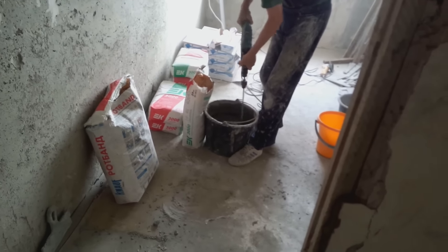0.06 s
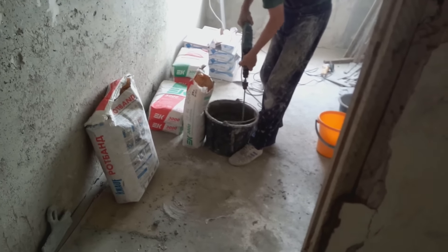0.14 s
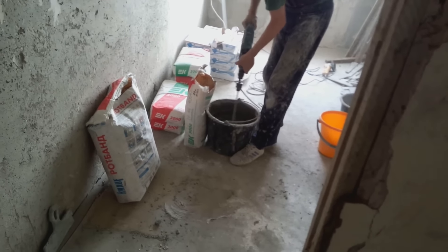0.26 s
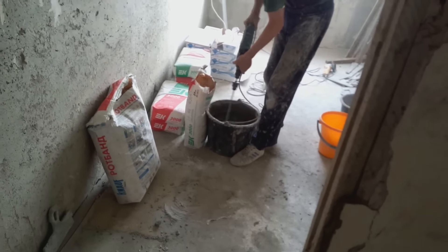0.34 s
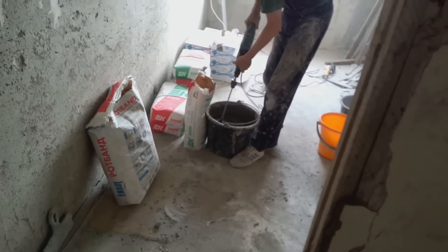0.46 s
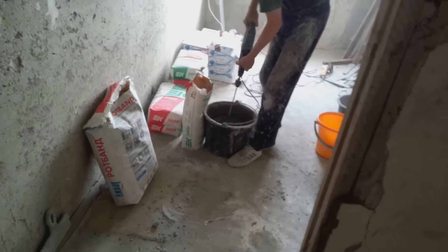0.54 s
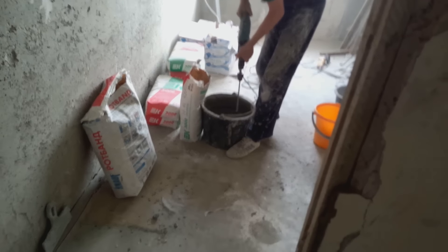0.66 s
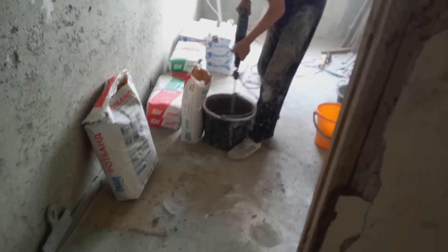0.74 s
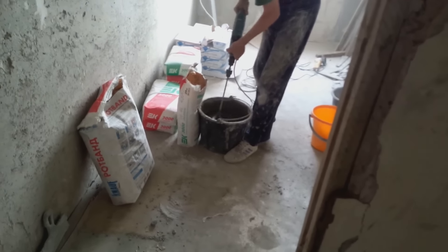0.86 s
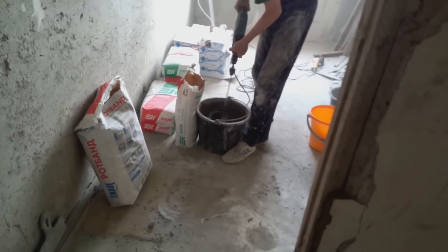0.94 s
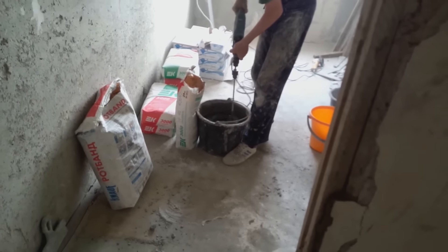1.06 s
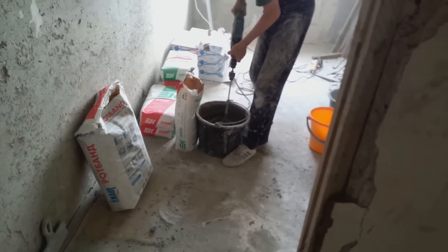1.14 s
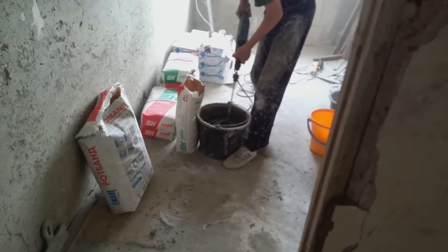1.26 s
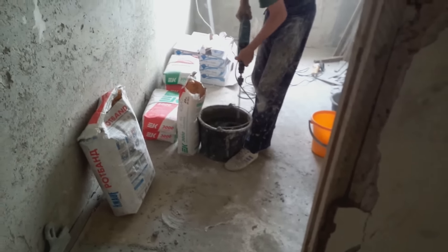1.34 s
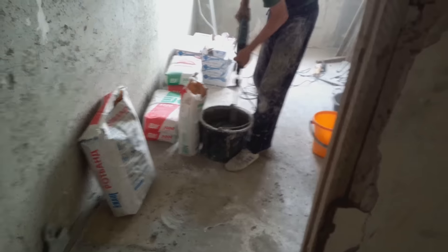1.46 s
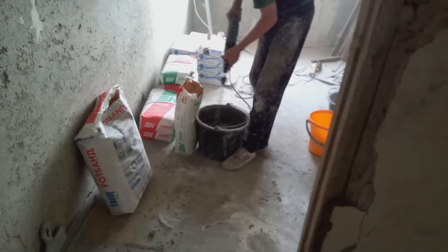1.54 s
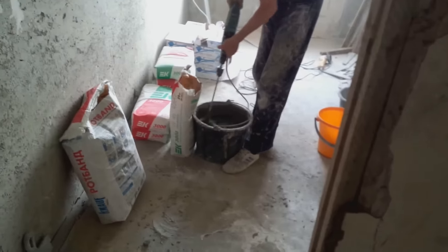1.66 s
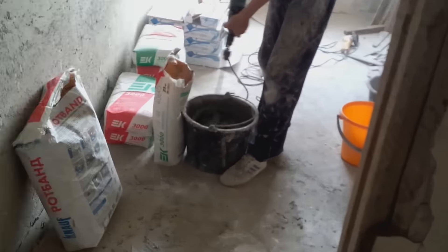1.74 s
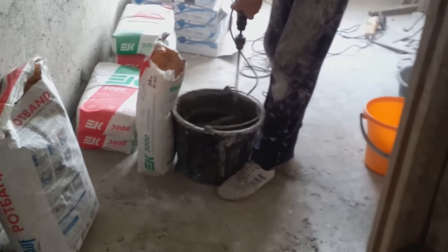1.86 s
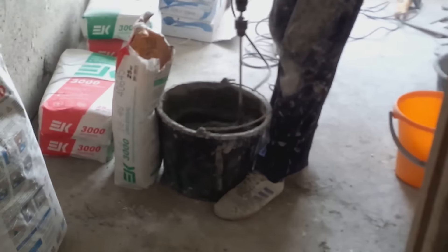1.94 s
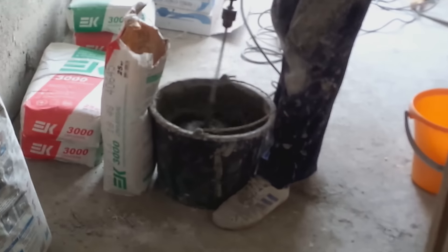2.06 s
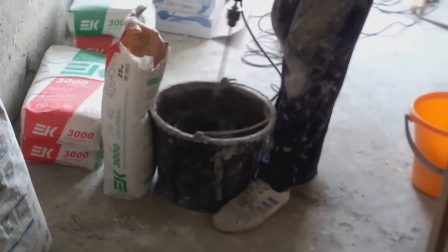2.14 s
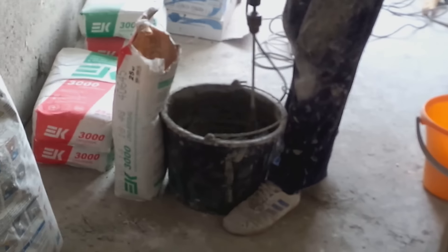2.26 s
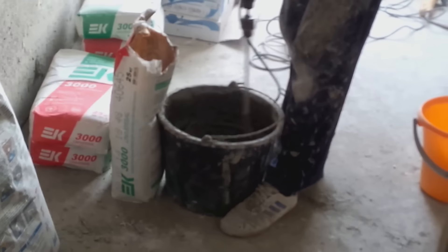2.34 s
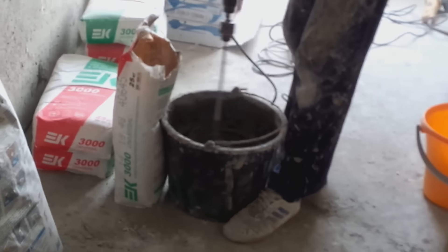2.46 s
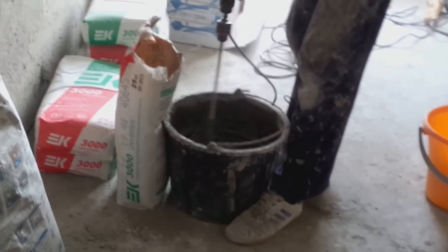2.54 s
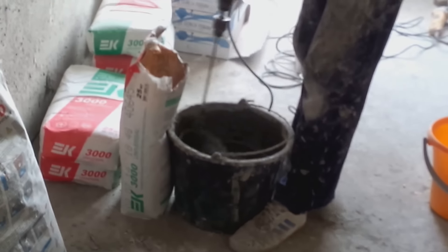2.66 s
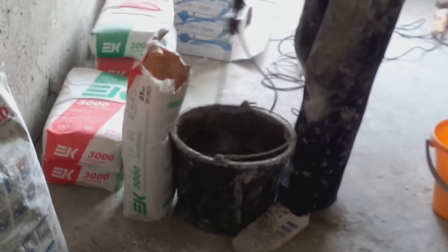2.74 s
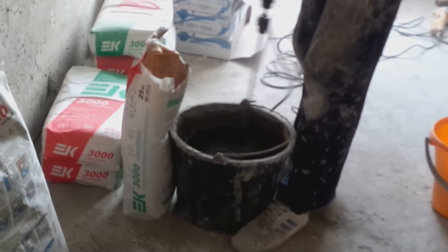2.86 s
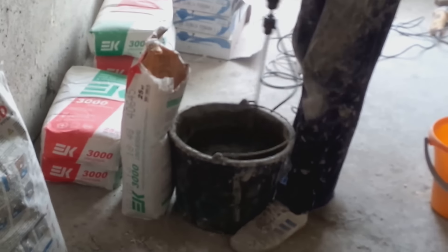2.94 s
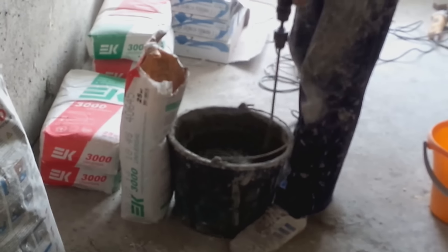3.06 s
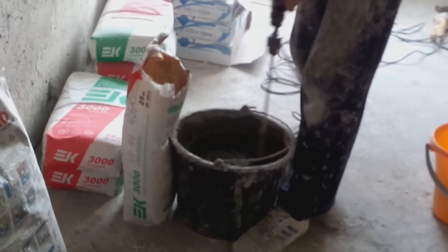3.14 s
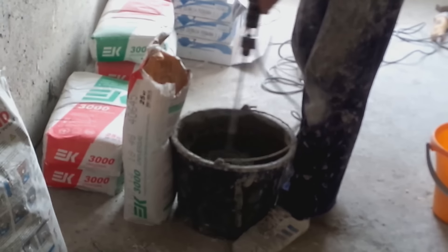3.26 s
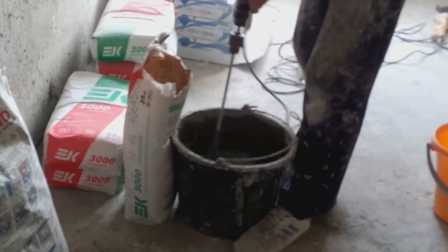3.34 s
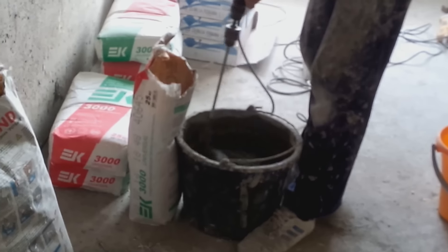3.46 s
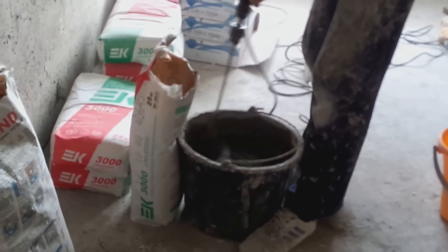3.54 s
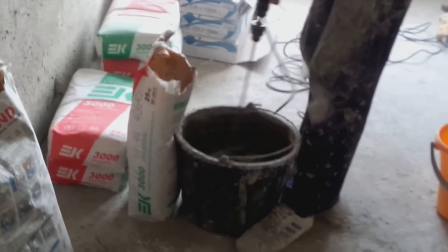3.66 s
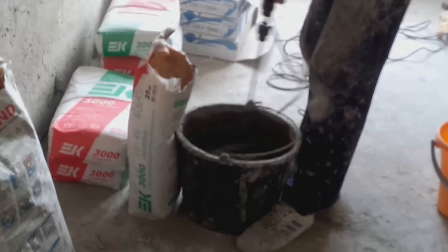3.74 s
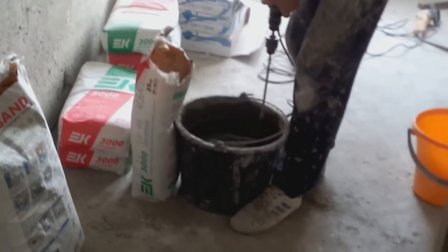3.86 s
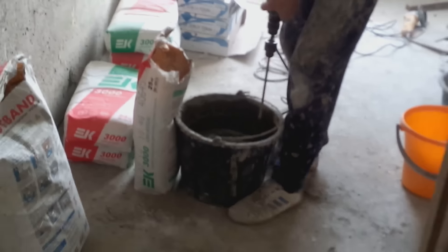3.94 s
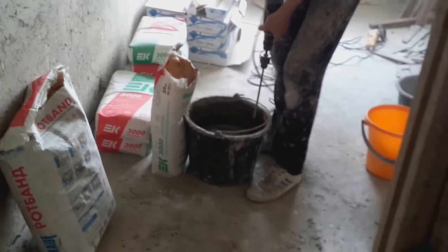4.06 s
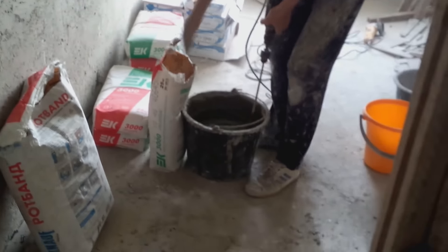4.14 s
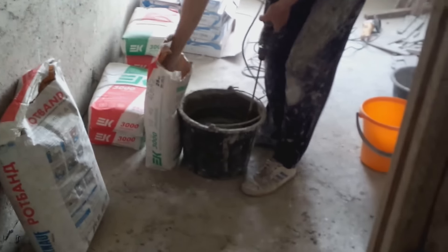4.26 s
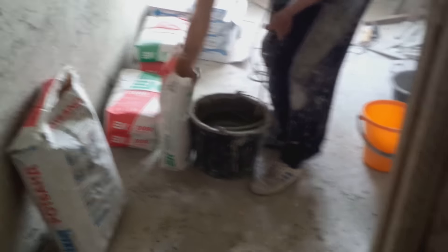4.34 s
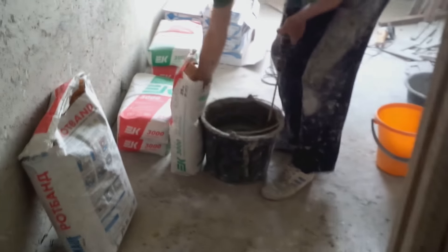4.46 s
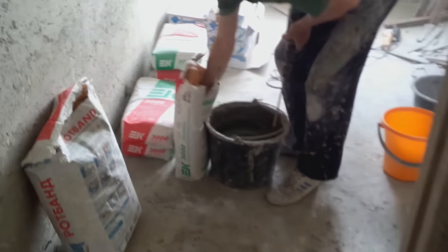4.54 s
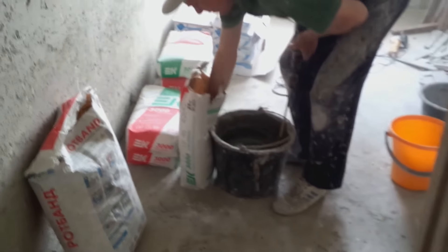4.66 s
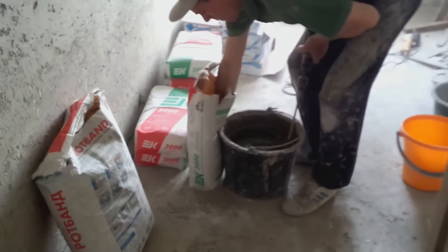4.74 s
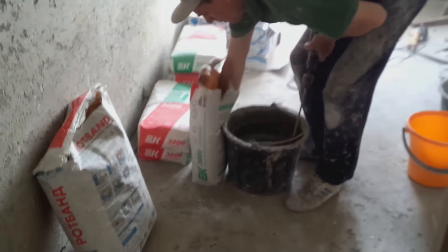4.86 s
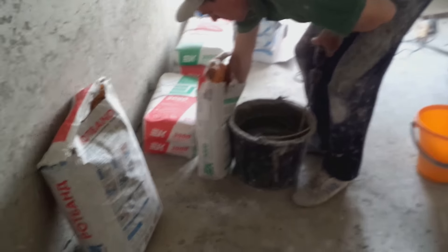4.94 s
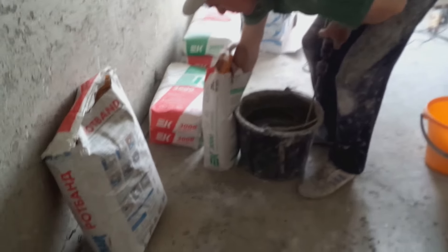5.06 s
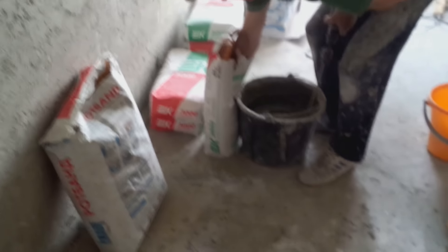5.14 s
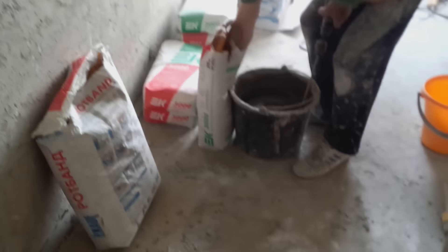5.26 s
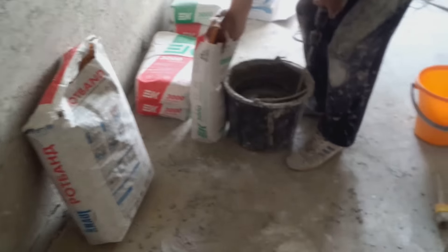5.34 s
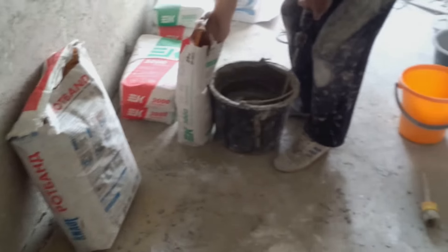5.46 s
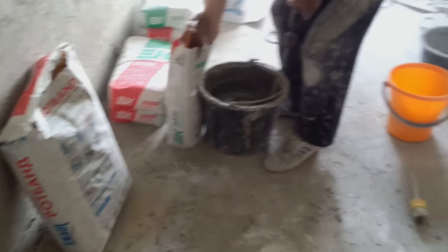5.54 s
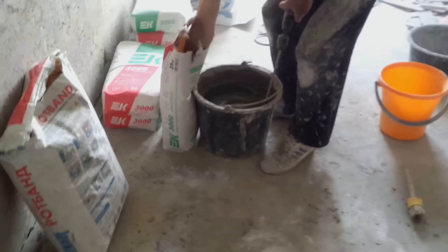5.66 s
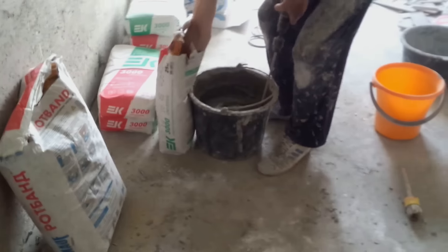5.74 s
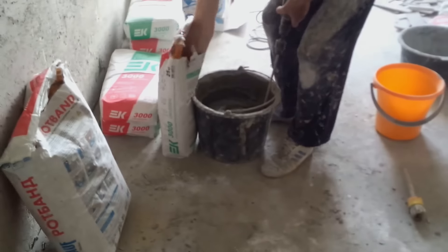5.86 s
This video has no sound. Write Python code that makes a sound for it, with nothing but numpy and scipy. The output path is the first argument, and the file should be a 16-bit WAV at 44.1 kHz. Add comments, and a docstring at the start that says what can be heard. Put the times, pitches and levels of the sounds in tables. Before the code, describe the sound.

In a bare room a loud geared drill whine stirs heavy mix, glides down in pitch to rest, and a paper sack crinkles.

```python
"""An electric drill turns a paddle in a bucket of thick plaster in a bare room: gear teeth whine as sine tones,
the fan sings and blows coloured noise, the mix churns in lumps and the paddle knocks the bucket wall.
The trigger is let go and the motor coasts to rest, its tones gliding down through the ringing gear case.
Near the end a paper sack ticks, as short damped rings, and rustles, as flickering noise.
A mono recorder with a low sampling rate mirrors the treble above its band edge."""
import sys
import numpy as np
from scipy import signal
from scipy.fft import rfft, irfft, next_fast_len
from scipy.io import wavfile
from scipy.ndimage import uniform_filter1d, map_coordinates

SR = 44100
rng = np.random.default_rng(int(sys.argv[2]) if len(sys.argv) > 2 else 0)


def unload_audio(sound):
    """Save the sound as a 16-bit wav file, at the path given as the first command line argument."""
    columns = np.transpose(np.atleast_2d(sound))
    # keep every value between -1 and 1, then stretch to whole-number steps
    steps = np.round(np.clip(columns, -1, 1) * 32767)
    wavfile.write(sys.argv[1], SR, steps.astype(np.int16))


def decibels_to_gain(level_db):
    """Convert a level in decibels to a linear amplitude gain (20 dB per decade)."""
    exponent = np.asarray(level_db, float) / 20
    return 10 ** exponent


N = 260631  # length in samples

BLADES_PER_TOOTH = 13 / 5  # fan blades that pass for each tooth contact
# The main tones of the drill, as multiples of the gear mesh rate (tooth contacts a second).
# The first three come from the teeth, the last from the fan blades.
TONE_MULTIPLES = [2, 3, 4, BLADES_PER_TOOTH]
# How the gear case radiates a gliding tone. Each row: frequency in Hz, gain in dB.
CASE_GAIN = [(600, -12), (800, 8), (950, -16), (1060, -2), (1150, -12), (1240, 2), (1350, -13), (1520, -5),
             (1610, 7.5), (1700, 4), (1830, 1.5), (2000, -9), (2180, 3.5), (2420, 2.5), (2520, -11),
             (2700, -15), (2860, 2), (3050, -15), (5000, -7)]


def unit(x):
    """Scales x to an rms of 1."""
    return x / np.sqrt(np.mean(x ** 2) + 1e-20)


def along(points, hz):
    """Reads a curve of (Hz, value) points at hz, on a log frequency axis."""
    f, v = np.transpose(points)
    return np.interp(np.log(hz + 1), np.log(f + 1), v)


def curves(rows):
    """Gives one value per sample for each column after the time."""
    s, *columns = np.transpose(rows)
    return [np.interp(np.arange(N) / SR, s, column) for column in columns]


def wobble(rate):
    """A smooth random curve through rate random points a second."""
    points = rng.standard_normal(int(N * rate / SR) + 4)
    return map_coordinates(points, [np.arange(N) * rate / SR])


def coloured(x, points):
    """Filters x with a gain curve of (Hz, dB) points."""
    m = next_fast_len(N + SR // 4)
    gain = decibels_to_gain(along(points, np.fft.rfftfreq(m, 1 / SR)))
    return irfft(rfft(x, m) * gain, m)[:N]


def resonant(x, modes):
    """Lifts narrow peaks in x, as a ringing body does; modes are (Hz, width in Hz, dB)."""
    m = next_fast_len(N + SR // 4)
    f = np.fft.rfftfreq(m, 1 / SR)
    lift = 1
    for hz, width, db in modes:
        lift = lift + decibels_to_gain(db) * 1j * f * width / (hz * hz - f * f + 1j * f * width)
    return irfft(rfft(x, m) * lift, m)[:N]


def patchy(patch_db):
    """White noise whose strength varies in patches of time and frequency."""
    z = signal.stft(rng.standard_normal(N), nperseg=512)[2]
    field = uniform_filter1d(rng.standard_normal(z.shape), size=6, axis=0)
    field = uniform_filter1d(field, size=8, axis=1)
    return signal.istft(z * decibels_to_gain(patch_db * unit(field)), nperseg=512)[1][:N]


def room(x):
    """The bare walls' answer: a noise tail in which each frequency dies at its own speed."""
    # Each row: frequency in Hz, time to fall by 60 dB in seconds.
    decay_times = [(200, 0.17), (2000, 0.23), (7000, 0.12)]
    hz, t, z = signal.stft(rng.standard_normal(SR // 2), SR, nperseg=256)
    fading = decibels_to_gain(-60 * t / along(decay_times, hz)[:, None])
    tail = signal.istft(z * fading, SR, nperseg=256)[1]
    return signal.fftconvolve(x, tail / np.linalg.norm(tail))[:N]


def knocks(events):
    """Short damped rings with a puff of noise, and their echo."""
    out, t = np.zeros(N + SR), np.arange(SR // 4) / SR
    for s, db, hz, t60, crack in events:
        ring = np.sin(2 * np.pi * hz * t) + crack * rng.standard_normal(len(t))
        soft_onset = 1 - np.exp(-40 * t / t60)
        out[round(s * SR):][:len(t)] += decibels_to_gain(db - 60 * t / t60) * soft_onset * ring
    return out[:N] + decibels_to_gain(-9) * room(out[:N])


def sack():
    """A hand reaches into the paper: ticks ring briefly, then flickering noise makes a crinkling rustle."""
    # Each row: start in seconds, level in dB, frequency in Hz, time to fall by 60 dB in seconds,
    # share of noise against the ring.
    ticks = [(5.561, -33, 1120, .014, .15), (5.809, -31, 1070, .014, .1), (5.816, -41, 4500, .008, 2.5)]
    # Each row: time in seconds, rustle level in dB.
    rustle_level = [(5.78, -90), (5.82, -57), (5.85, -57), (5.865, -49), (5.89, -51), (5.91, -50)]
    # Colour of the rustle. Each row: frequency in Hz, gain in dB.
    paper_colour = [(900, -40), (1500, -14), (2100, -12), (2350, 0), (2550, -7), (2750, -2), (3000, -12),
                    (7000, -17), (9000, -45)]
    flickering = rng.standard_normal(N) * decibels_to_gain(2.5 * wobble(150))
    crinkle = unit(coloured(flickering, paper_colour))
    return knocks(ticks) + decibels_to_gain(curves(rustle_level)[0]) * crinkle


def bucket():
    """The paddle churns the mix in lumps and knocks the wall; the floor carries a rumble."""
    # Each row: time in seconds, level of the churning mix in dB, level of the rumble in dB.
    levels = [(0, -30.5, -48), (.1, -31.5, -43), (.36, -31.5, -42), (.41, -27.5, -52), (.5, -26.5, -36),
              (.6, -30.5, -34), (.72, -35.5, -43), (.9, -33.5, -39.5), (1.18, -39.5, -40),
              (1.62, -52.5, -63), (1.7, -35, -51), (1.83, -44, -60), (1.89, -37, -53), (2.45, -49, -62),
              (2.7, -39, -50), (2.85, -38.5, -52), (3.01, -33, -49), (3.06, -38.5, -51), (3.44, -39, -52),
              (3.55, -34, -55), (3.9, -39, -42.5), (4.2, -38.5, -55), (4.56, -41.5, -55),
              (4.66, -32.5, -54), (4.72, -30, -54), (4.84, -41, -56), (5.3, -48, -67), (5.4, -38.5, -57),
              (5.46, -47.5, -66), (5.91, -57, -60)]
    # Colours of the mix and of the rumble. Each row: frequency in Hz, gain in dB.
    mix_colour = [(47, -39), (80, -12.5), (118, -7.5), (216, -1), (392, -3.5), (450, -2), (550, -22),
                  (720, -28), (1210, -120)]
    rumble_colour = [(18, -37), (30, 9), (48, 10.5), (65, -16), (91, 9.5), (110, 2), (140, -37),
                     (240, -120)]
    # Paddle against the bucket. Each row: start in seconds, strength in dB (each wall ring adds its own level).
    thuds = [(1.69, -18), (4.6, -27), (4.628, -24), (4.66, -26), (4.69, -18), (4.73, -24), (4.762, -25),
             (4.79, -28)]
    # Rings of the bucket wall. Each row: frequency in Hz, level in dB against the blow,
    # time to fall by 60 dB in seconds.
    wall_rings = [(262, 2, .045), (400, -5, .035), (180, -7, .04), (110, -15, .045)]
    # One blow rings the paddle's shaft. Each row: start in seconds, level in dB, frequency in Hz,
    # time to fall by 60 dB in seconds, share of noise against the ring.
    shaft_ring = [(4.688, -16, 1810, .14, .1)]
    mix_db, rumble_db = curves(levels)
    lumps = decibels_to_gain(1.7 * wobble(14) + 0.65 * wobble(8))
    churn = decibels_to_gain(mix_db) * unit(lumps * coloured(patchy(patch_db=1.0), mix_colour))
    swelling = decibels_to_gain(2.5 * wobble(5))
    rumble = decibels_to_gain(rumble_db) * unit(swelling * coloured(rng.standard_normal(N), rumble_colour))
    blows = [(s, db + ring_db, hz, t60, 0.05) for s, db in thuds for hz, ring_db, t60 in wall_rings]
    return churn + rumble + knocks(blows + shaft_ring)


def housing_growl(growl_db):
    """The housing growls: almost even noise in a fixed colour."""
    # Each row: frequency in Hz, gain in dB.
    growl_colour = [(240, -23.5), (400, -14.5), (449, -9.5), (590, -8.5), (812, 0), (1040, -4), (1230, -8),
                    (1600, -7.5), (2080, -9.5), (3520, -120)]
    return decibels_to_gain(growl_db) * unit(coloured(patchy(patch_db=0.1), growl_colour))


def air_rush(mesh, rush_db, turning):
    """Gear and air noise, partly struck in time with the teeth, that dulls as the speed falls."""
    # Colours at speed and near rest. Each row: frequency in Hz, gain in dB.
    fast_colour = [(710, -35.5), (1200, -9.5), (1550, -6), (1760, 0), (1950, -7.5), (2660, -4.5),
                   (3020, -6), (4300, -5.5), (5860, -11.5), (7000, -11.5), (9100, -36.5), (15400, -120)]
    slow_colour = [(350, -44.5), (600, -7), (651, -5), (817, -18), (887, -9.5), (1710, -6), (4880, -12),
                   (7000, -17), (9100, -38), (15400, -120)]
    # Rings of the gear case near rest. Each row: frequency in Hz, width in Hz, gain in dB.
    case_rings = [(810, 50, 4), (1200, 60, 4), (1780, 80, -4)]
    fast = np.interp(np.arange(N) / SR, [4.5, 5.4], [1, 0])
    struck = 1 + 0.28 * np.cos(mesh) * turning
    air = patchy(patch_db=1.0) * struck * decibels_to_gain(0.73 * wobble(120) + 0.32 * wobble(30))
    at_speed = unit(coloured(air, fast_colour))
    near_rest = 1.7 * unit(resonant(coloured(air, slow_colour), case_rings))
    return decibels_to_gain(rush_db) * (fast * at_speed + (1 - fast) * near_rest)


def faint_partials(mesh, hz, driven):
    """Weaker tooth multiples, unsteady and blurred by play in the gears; coasting, the case picks them out."""
    # Each row: multiple of the mesh rate, level in dB before the rush, strain and case gains are added.
    partials = [(1, -15.5), (14 / 15, -14.5), (5, -14.5), (6, -13.5), (7, -17.5), (7.8, -18.5), (8, -18.5)]
    out = np.zeros(N)
    for k, db in partials:
        hum_drop_db = 14 if k <= 1 else 0  # the lowest partials need the load
        gliding_db = (1 - driven) * (1.5 + along(CASE_GAIN, k * hz) - hum_drop_db)
        blur = 1.5 * np.sqrt(hz / hz.max()) * wobble(95)
        out += decibels_to_gain(db + 3 * wobble(9) + gliding_db) * np.sin(k * mesh + blur)
    return out


def tone_levels(hz, coasted, driven):
    """Levels of the main tones in dB: unsteady under power, then sinking while the case colours the glide."""
    # Under power, the tone at twice the mesh rate. Each row: time in seconds, level in dB.
    whine_level = [(0.02, -14.5), (.08, -29), (.34, -25.5), (.43, -19.5), (.54, -29.5), (.65, -17.5),
                   (.8, -30.5), (.88, -18), (.95, -25.5), (1.15, -22), (1.3, -24), (1.41, -17.5),
                   (1.6, -27), (1.83, -19), (1.89, -33), (1.99, -25), (2.06, -18), (2.2, -23.5),
                   (2.36, -35), (2.41, -12.5), (2.53, -17), (2.63, -20.5), (2.76, -18.5), (2.8, -20),
                   (2.9, -14.5), (2.94, -23), (3.15, -32), (3.3, -18.5), (3.37, -32.5), (3.66, -27.5),
                   (3.81, -18.5), (3.99, -21), (4.16, -13)]
    # Under power, the others. Each row: time in seconds, levels in dB at three times and four times
    # the mesh rate and of the fan blade tone.
    overtone_levels = [(0, -30.5, -28, -28), (.22, -18.5, -31.5, -31), (.62, -31.5, -27, -27),
                       (.76, -30.5, -31, -29.5), (.9, -21.5, -27, -28), (1.2, -33, -31.5, -32),
                       (1.34, -22.5, -27, -26), (1.72, -34.5, -35, -39), (1.88, -28, -36, -29),
                       (2.02, -25.5, -37, -39), (2.4, -33.5, -33, -35), (2.7, -29, -34, -30.5),
                       (3.1, -30.5, -29, -34), (3.2, -25.5, -28, -39), (3.36, -34, -35, -33),
                       (3.58, -37, -32, -31), (3.68, -29.5, -35, -20.5), (3.85, -32, -31, -40),
                       (3.93, -28.5, -24, -40), (4.17, -27.5, -30.5, -31)]
    # Starting level in dB of each main tone in the coast, before the case gain is added.
    coast_start = [-26.5, -23, -28, -32.5]
    # random fading as the tool swings about
    powered_db = [curves(whine_level)[0] + 0.5 * wobble(12)]
    powered_db += [db + 2 * wobble(18) for db in curves(overtone_levels)]
    sink_db = 24.5 * coasted  # 24.5 dB a second
    coasting_db = [db - sink_db + along(CASE_GAIN, k * hz) for k, db in zip(TONE_MULTIPLES, coast_start)]
    return driven * np.array(powered_db) + (1 - driven) * np.array(coasting_db)


def whine(mesh, levels_db, backlash):
    """Tooth contacts sound as multiples of the mesh rate; the fan blades add a tone of their own."""
    wheel = mesh / 15  # a driven wheel of 15 teeth runs slightly untrue: sidebands once a turn
    out = np.zeros(N)
    for k, db in zip(TONE_MULTIPLES, levels_db):
        untrue = (0.26 + 0.25 * wobble(4.014)) * np.sin(wheel + 1.3 * wobble(3.003))
        drift = k * (0.044 * k * wobble(60) + backlash * wobble(110)) + untrue
        flutter = 1 + 0.26 * wobble(30) + 0.25 * wobble(80)
        out += decibels_to_gain(db) * flutter * np.sqrt(2) * np.sin(k * mesh + drift)
    return out


def drill():
    """The motor's speed sets the whine, which stands over growl and rush and echoes in the room."""
    # The speed sags with the load, then coasts down. Each row: time in seconds,
    # gear mesh rate in Hz before smoothing.
    speed = [(0, 890.4), (.37, 860), (.58, 845.4), (.74, 848.5), (.88, 858), (1.02, 842.3), (1.15, 858),
             (1.48, 870), (1.85, 881.5), (2.4, 883.4), (2.59, 883), (2.96, 900.4), (3.1, 892.5),
             (3.33, 897.5), (3.55, 907.6), (3.7, 910.5), (4.07, 903), (4.18, 903.4), (4.27, 807),
             (4.36, 746.4), (4.66, 490), (4.8, 421), (4.93, 384.2), (5.05, 320.2), (5.25, 249), (5.42, 208),
             (5.7, 130)]
    # Each row: time in seconds, housing growl level in dB, gear and air rush level in dB (before wavering).
    noise_levels = [(0, -26, -19.5), (1.3, -27, -20.5), (1.7, -25.5, -19), (4.2, -25, -19),
                    (4.35, -26, -19.5), (4.59, -28, -23.5), (4.65, -23, -24.5), (5.04, -35, -36),
                    (5.12, -40, -37), (5.44, -43, -47), (5.52, -45, -53), (5.58, -50, -53.5),
                    (5.87, -59, -59.5), (5.91, -56, -51)]
    t = np.arange(N) / SR
    hz = uniform_filter1d(curves(speed)[0], size=1800)  # the rotor's inertia smooths its speed
    mesh = 2 * np.pi * np.cumsum(hz) / SR  # phase of the tooth contacts
    coasted = np.maximum(t - 4.185, 0)  # seconds since the trigger was let go
    driven = np.clip(1 - coasted / 0.025, 0, 1)
    loaded = np.clip(1 - coasted / 0.1, 0, 1)
    turning = np.interp(t, [5.35, 5.6], [1, 0])
    growl_db, rush_db = curves(noise_levels)
    growl_db = growl_db + wobble(12)
    rush_db = rush_db + 0.5 * wobble(10)
    backlash = 0.5 * (1 - loaded)  # unloaded teeth rattle
    # a thicker load slows the motor and presses the teeth harder
    strain_db = 1.54 + 0.044 * (880 - np.maximum(hz, 840))
    main_tones = whine(mesh, tone_levels(hz, coasted, driven), backlash)
    faint_tones = decibels_to_gain(strain_db + rush_db) * faint_partials(mesh, hz, driven)
    tones = turning * (main_tones + faint_tones)
    return air_rush(mesh, rush_db, turning) + housing_growl(growl_db) + tones + decibels_to_gain(-15) * room(tones)


def scene():
    """Everything reaches one microphone."""
    mono = sack() + bucket() + drill()
    return np.array([mono, mono])


def band_limit(x):
    """A steep low-pass at the top of the band."""
    return signal.sosfilt(signal.butter(12, 11820, fs=SR, output="sos"), x)


def record(dry):
    """Sampled at a low rate, then raised again: a weak mirror image remains above the band edge."""
    # The band that is kept, and the colour of its mirror image. Each row: frequency in Hz, gain in dB.
    kept_band = [(20, -2), (6900, 0), (7300, -1.5), (7600, -11.5), (7900, -22), (8000, -47), (8200, -120)]
    mirror_colour = [(7900, -120), (8050, -1), (8700, -5), (9000, -8), (10000, -17), (11000, -28.5),
                     (11700, -40.5), (11950, -69), (14000, -66), (14600, -72), (15000, -120)]
    sampling_hz = 16000
    kept = coloured(dry[0], kept_band)
    mirrored = 2 * kept * np.cos(2 * np.pi * sampling_hz * np.arange(N) / SR)
    image = coloured(mirrored, mirror_colour)
    mono = kept + image - 0.0117  # a small constant offset
    return band_limit(np.array([mono, mono]))


dry = scene()
out = record(dry)
unload_audio(out)
```